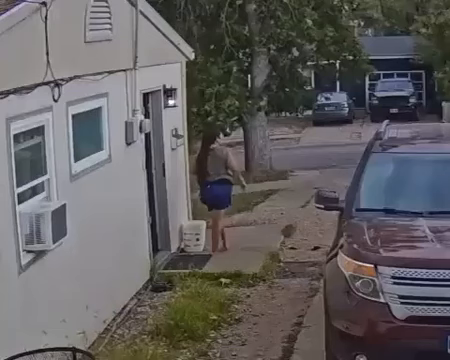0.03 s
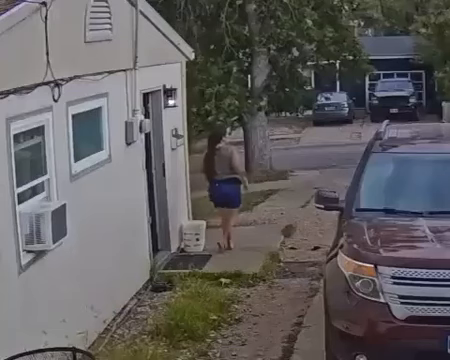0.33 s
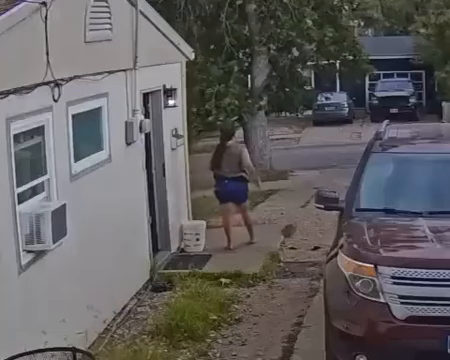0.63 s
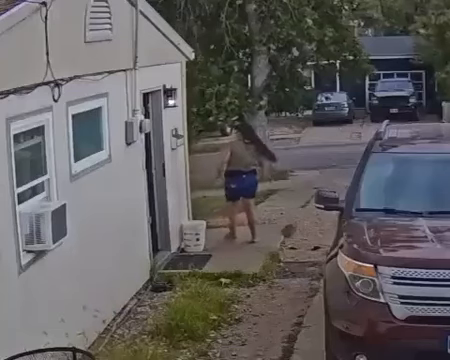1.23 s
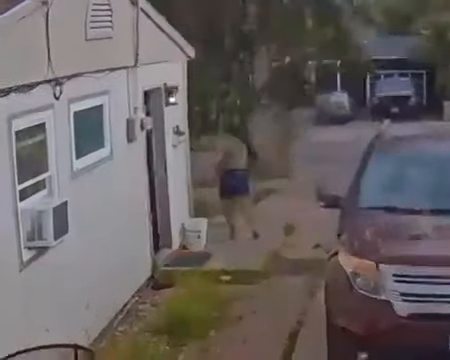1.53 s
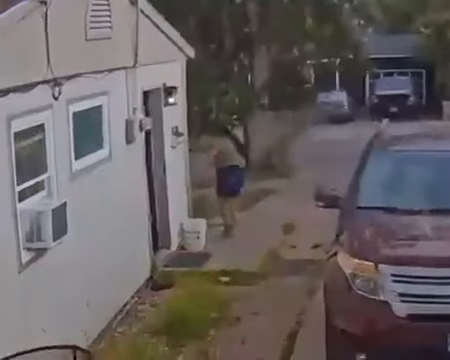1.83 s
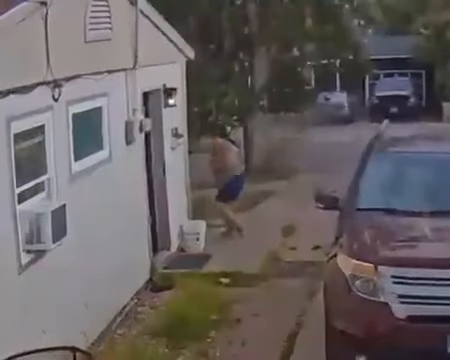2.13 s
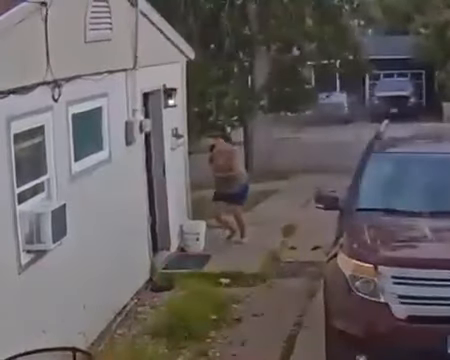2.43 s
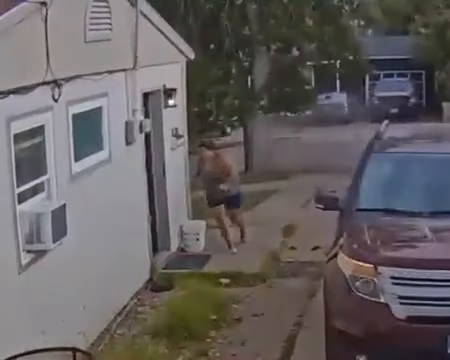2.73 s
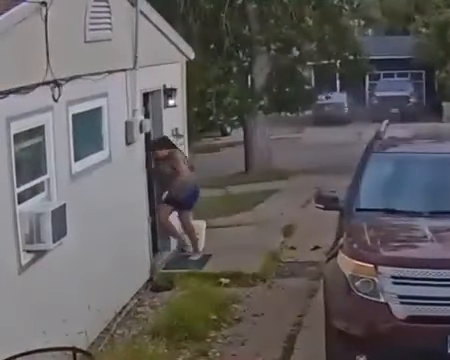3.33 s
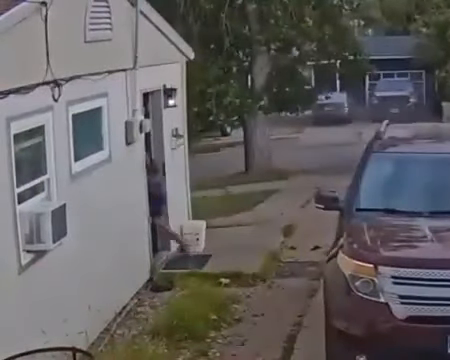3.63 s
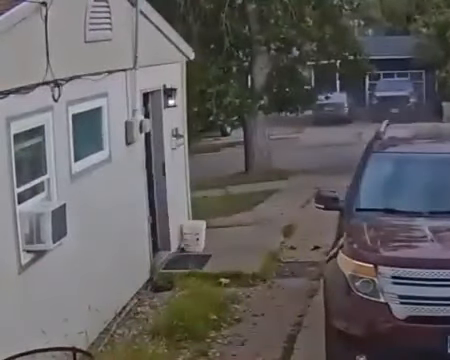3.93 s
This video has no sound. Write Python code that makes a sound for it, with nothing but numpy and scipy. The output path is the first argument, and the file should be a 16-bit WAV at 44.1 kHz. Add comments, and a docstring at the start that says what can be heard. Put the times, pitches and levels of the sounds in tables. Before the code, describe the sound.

A close lightning strike cracks violently, then rolls on as rumbling thunder.

```python
"""A lightning strike a few steps from a house: a bright crack of dense shock waves that dulls into
rolling peals from the bends of the bolt. A muffled rumble with dull bumps and a wavering drone leads in;
then sparks snap and a pressure front arrives just ahead of the crack. The house wall returns one quick
echo of crack and peals, and the small outdoor microphone overloads."""
import sys
import numpy as np
from scipy import signal
from scipy.fft import rfft, irfft, next_fast_len
from scipy.io import wavfile
from scipy.ndimage import uniform_filter1d, map_coordinates

SR = 44100
rng = np.random.default_rng(int(sys.argv[2]) if len(sys.argv) > 2 else 0)


def file_out(sig):
    """Save sig as 16-bit WAV at sys.argv[1]."""
    # one column per channel
    cols = np.atleast_2d(sig).T
    # limit, then scale
    lim = np.clip(cols, -1, 1)
    pcm = np.round(lim * 32767).astype(np.int16)
    wavfile.write(sys.argv[1], SR, pcm)


N = 176400
RUMBLE_S, FRONT_S, CRACK_S = .145, 1.481, 1.512  # entry cues
PUSH_S = .031  # length of the pressure front's push
TOP_HZ = 7100  # the microphone's band limit


def amp(db):
    """Decibels to gain."""
    return 10 ** (np.asarray(db) / 20)


def unit(x):
    """Scale to rms 1."""
    return x / np.sqrt(np.mean(x ** 2) + 1e-20)


def along(points, hz):
    """Read a curve of (freq_hz, value) points on a log frequency axis."""
    freqs, values = np.transpose(points)
    return np.interp(np.log(hz + 1), np.log(freqs + 1), values)


def since(start_s):
    """Seconds after a cue, zero before it."""
    return np.maximum(np.arange(N) / SR - start_s, 0)


def attack(start_s, rise_s):
    """An envelope that opens from 0 towards 1 at a cue."""
    return 1 - np.exp(-since(start_s) / rise_s)


def fader(points):
    """Gain per sample from (time_s, level_db) points."""
    return amp(np.interp(since(0), *np.transpose(points)))


def wobble(knots_per_s):
    """A smooth random curve."""
    return map_coordinates(rng.standard_normal(400), [since(0) * knots_per_s], mode="wrap")


def filtered(x, response):
    """Filter x by a gain given as a function of frequency."""
    size = next_fast_len(N + SR // 2)
    return irfft(rfft(x, size) * response(np.fft.rfftfreq(size, 1 / SR)), size)[:N]


def coloured(x, eq, even_s=.042):
    """Apply an EQ that rolls off above its last point, then even out slow swells to rms 1."""
    shaped = filtered(x, lambda hz: amp(along(eq, hz)) / np.maximum(hz / eq[-1][0], 1) ** 2)
    power = uniform_filter1d(shaped ** 2, int(even_s * SR))
    return shaped / np.sqrt(np.abs(power) + 1e-20)


def shocks(per_s=9000, spread_db=1.5):
    """Shock fronts of random size and sign at random moments."""
    arrives = rng.random(N) < per_s / SR
    return arrives * np.sign(rng.standard_normal(N)) * amp(spread_db * rng.standard_normal(N))


# Fader rides of the rumble's low and mid layers, before trim: time_s, level_db
LOW_RIDE = [(0.15, -21.5), (0.308, -34.5), (0.38, -18.5), (0.428, -25.5), (0.472, -14.5), (0.568, -27.5),
            (0.59, -25), (0.712, -36), (0.74, -40.5), (0.91, -28), (0.928, -32), (1.156, -26.5),
            (1.226, -40), (1.244, -28.5), (1.286, -44), (1.332, -42.5), (1.406, -27.5), (1.47, -20.5)]
MID_RIDE = [(0.15, -28.5), (0.266, -33), (0.304, -43), (0.354, -32.5), (0.502, -30), (0.546, -34.5),
            (0.708, -35.5), (0.77, -50), (1.036, -47), (1.082, -52), (1.194, -49.5), (1.212, -55),
            (1.248, -48.5), (1.266, -51), (1.348, -61), (1.37, -53), (1.428, -49.5), (1.47, -35)]
# Tone of the same two layers: freq_hz, gain_db
LOW_EQ = [(20, -27.5), (60, -15.5), (100, -10), (135, 0), (190, -1.5), (255, 3.5), (310, -6), (400, -9),
          (470, -28), (900, -41)]
MID_EQ = [(20, -16), (60, 3.5), (250, -4.5), (480, 1), (750, -4), (1080, -13), (1400, -24.5), (1800, -33.5),
          (1950, -54)]

def rumble(low_trim_db=-2, mid_trim_db=1.5, drone_peak_s=1.175, drone_half_s=.11):
    """Two layers of muffled noise that die away at the front; the low one briefly narrows to a drone."""
    drone_share = .81 * np.exp(-.5 * ((since(0) - drone_peak_s) / drone_half_s) ** 2)
    broad = coloured(rng.standard_normal(N), LOW_EQ)
    blend = np.sqrt(1 - drone_share) * broad + np.sqrt(drone_share) * drone()
    low = amp(low_trim_db) * fader(LOW_RIDE) * blend
    mid = amp(mid_trim_db) * fader(MID_RIDE) * coloured(rng.standard_normal(N), MID_EQ)
    fade_in = np.clip(since(RUMBLE_S) / .0025, 0, 1)
    return (low + mid) * fade_in * np.exp(-since(FRONT_S) / PUSH_S)


# Dull bumps in the rumble, before trim: start_s, pitch_hz, level_db
BUMPS = [(.145, 191, -14), (0.261, 203, -17), (.332, 150, -19), (.366, 260, -16), (0.392, 210, -14),
         (0.467, 256, -11), (0.901, 133, -17), (1.41, 157, -14), (1.459, 205, -21)]

def bumps(rise_s=.0025, t60_s=.041, trim_db=5.5):
    """Each bump is a low sine, damped within a few cycles."""
    x = np.zeros(N)
    for start_s, pitch_hz, level_db in BUMPS:
        t = since(start_s)
        envelope = attack(start_s, rise_s) * amp(level_db + trim_db - 60 * t / t60_s)
        x -= envelope * np.sin(2 * np.pi * pitch_hz * t)
    return x


def hiss(lead_in, relative_db=-38, floor_db=-71.5):
    """Faint hiss that follows the level of the lead-in, over a steady floor."""
    follower = np.sqrt(np.abs(uniform_filter1d(lead_in ** 2, size=400)))
    gain = np.hypot(amp(relative_db) * follower, amp(floor_db)) * (since(RUMBLE_S) > 0)
    return gain * unit(filtered(rng.standard_normal(N), lambda hz: hz < TOP_HZ))


def drone(pitch_hz=247, width_hz=22):
    """A narrow band of noise, heard as a wavering low tone."""
    phase = 2 * np.pi * pitch_hz * since(0)
    return unit(wobble(2 * width_hz) * np.sin(phase) + wobble(2 * width_hz) * np.cos(phase))


# Snaps just ahead of the crack: start_s, level_db
SPARKS = [(1.462, -42), (1.464, -35), (1.4705, -27), (1.475, -29), (1.483, -15.5), (1.4875, -19),
          (1.495, -22), (1.505, -22)]

def sparks(grit, t60_s=.007):
    """Each spark is a tiny burst of bright shocks with an instant attack."""
    return grit * sum((since(start_s) > 0) * amp(level_db - 60 * since(start_s) / t60_s)
                      for start_s, level_db in SPARKS)


def pressure_front(grit, push_db=-12.5, suction_db=-14, sizzle_db=-18, release_s=.01):
    """The front pushes, sizzles and swings into suction."""
    t, after_push = since(FRONT_S), since(FRONT_S + PUSH_S)
    release = np.exp(-after_push / release_s)
    push = amp(push_db) * (t > 0) * np.exp(-t / PUSH_S)
    pressure = np.where(after_push > 0, -amp(suction_db) * release, push)
    sizzle = amp(sizzle_db) * attack(FRONT_S, rise_s=.016) * release * grit
    return pressure + sizzle


# Bright tone of the crack, shared by sparks and sizzle: freq_hz, gain_db
CRACK_EQ = [(20, -5), (60, 3.5), (200, 1.5), (500, 1.5), (1000, -1), (2000, 0), (3500, 0.5), (5500, 3.5),
            (7000, 0.5)]
# How long each band stays at full strength: freq_hz, hold_s
CRACK_HOLD = [(30, 0.64), (200, 0.45), (1000, 0.34), (2000, 0.36), (3500, 0.2), (6000, 0.08)]
# Decay after the hold; farther parts of the bolt arrive duller: freq_hz, fade_db_per_s
CRACK_FADE = [(30, 31), (200, 11), (1000, 10.5), (2000, 13), (3500, 18), (6000, 29.5)]
CRACK_RISE_S = .0096

def crack(level_db=-11.5, surge_db=1.95, surges_per_s=22):
    """Dense shocks from the near part of the bolt hit, hold and fade in surges, treble first."""
    hz, t, spectrum = signal.stft(coloured(wall(shocks()), CRACK_EQ), SR, nperseg=1024)
    fading_s = np.maximum(t - CRACK_S - along(CRACK_HOLD, hz)[:, None], 0)
    fade = amp(-along(CRACK_FADE, hz)[:, None] * fading_s)
    tear = signal.istft(spectrum * fade, SR, nperseg=1024)[1][:N]
    surges = amp(surge_db * np.tanh(2 * since(CRACK_S)) * wobble(surges_per_s))
    return amp(level_db) * attack(CRACK_S, CRACK_RISE_S) * surges * tear


def wall(x, delay_s=.02407, gain=.52):
    """The sound plus its slap off the house wall, at equal total power."""
    echo = gain * np.pad(x, (round(delay_s * SR), 0))[:N]
    return (x + echo) / np.hypot(1, gain)


# Fader ride of the deep bass, before trim: time_s, level_db
SUB_RIDE = [(1.52, -30), (1.75, -28.5), (1.77, -26), (1.84, -18.5), (2.06, -33), (2.09, -21.5),
            (2.46, -37.5), (2.71, -36.5), (2.74, -48), (2.78, -30), (2.85, -41), (3.11, -40.5),
            (3.19, -46.5), (3.4, -44), (3.52, -42), (3.55, -39), (3.9, -58), (4.0, -40)]
# Its tone: freq_hz, gain_db
SUB_EQ = [(12, -8.5), (25, -2), (55, -1.5), (90, 2.5), (150, -23)]

def sub_bass(trim_db=-1):
    """Deep noise that opens with the crack and puts weight under the peals."""
    weight = coloured(rng.standard_normal(N), SUB_EQ)
    return amp(trim_db) * fader(SUB_RIDE) * attack(CRACK_S, CRACK_RISE_S) * weight


# Peals from the bends of the bolt:
# peak_s, half_length_s, boom_db, body_db, clap_db, rattle_db, crackle_db
PEALS = [(1.535, .008, -17.5, -30, -25, -30, -28), (1.654, .012, -22, -23.5, -21.5, -29, -21.5),
         (1.817, 0.018, -18.5, -21.5, -26, -33, -20.5), (1.906, 0.021, -17.5, -25.5, -26, -22.5, -29),
         (2.024, 0.024, -24.5, -18.5, -32.5, -23, -24), (2.1, 0.023, -19.5, -17.5, -37, -39, -45),
         (2.171, 0.026, -24.5, -18, -30, -23.5, -26.5), (2.27, 0.022, -20, -18.5, -33, -39, -26),
         (2.344, 0.016, -24.5, -18, -29, -29.5, -27.5), (2.447, 0.029, -25.5, -18.5, -25.5, -31, -45),
         (2.527, 0.024, -18.5, -21, -45, -44, -38), (2.566, 0.028, -19.5, -18, -25.5, -29, -26),
         (2.703, 0.022, -24, -23, -32.5, -30, -32), (2.795, 0.017, -21, -24, -34, -31, -33.5),
         (2.952, 0.033, -30, -24, -38, -30.5, -55), (3.063, 0.029, -28, -24, -32, -29, -44),
         (3.219, 0.03, -28, -23, -33.5, -46, -48), (3.277, 0.011, -26, -24.5, -43, -51, -48),
         (3.353, .016, -28.5, -19.5, -31, -44, -45), (3.405, 0.016, -20.5, -25, -18.5, -31, -38),
         (3.451, 0.033, -39.5, -33, -37.5, -33, -41.5), (3.597, .024, -24.5, -22, -31, -32, -42),
         (3.695, 0.038, -34, -25, -33.5, -33.5, -48), (3.751, 0.023, -29, -22, -33, -30, -51),
         (3.804, .016, -25, -20.5, -41, -33, -58), (3.888, 0.034, -25.5, -25, -42.5, -41.5, -49),
         (3.99, 0.028, -30.5, -21.5, -52, -45, -56)]
# Tone of a peal's five registers, dark to bright: freq_hz, gain_db
BOOM_EQ = [(20, -23.5), (60, -16), (110, -7.5), (170, 0), (300, 1), (390, -0.5), (520, -9.5), (1000, -51.5)]
BODY_EQ = [(200, -45), (350, -2.5), (450, 2.5), (700, -3), (950, -3.5), (1250, -20), (2500, -31),
           (7000, -51)]
CLAP_EQ = [(500, -26), (850, -2), (1150, 0), (1450, -4), (1750, -5.5), (2300, -25), (4000, -41.5)]
RATTLE_EQ = [(900, -24.5), (1400, -7.5), (1750, 4), (2150, 3.5), (2400, -6), (2800, -12.5), (3500, -27)]
CRACKLE_EQ = [(1500, -23.5), (2600, 7.5), (3700, 1), (4500, -6), (5500, -8.5), (7000, -16.5)]

def peals(shocks_per_s=1800, crackle_per_s=660):
    """Each peal is a swelling cluster of shocks with its own mix of five registers."""
    peak_s, half_length_s, *levels_db = np.transpose(PEALS)
    swells = np.exp(-.5 * ((since(0) - peak_s[:, None]) / half_length_s[:, None]) ** 2)
    registers = BOOM_EQ, BODY_EQ, CLAP_EQ, RATTLE_EQ, CRACKLE_EQ
    rates = [shocks_per_s] * 4 + [crackle_per_s]
    x = np.zeros(N)
    for level_db, eq, per_s in zip(levels_db, registers, rates):
        envelope = np.sqrt(amp(level_db) ** 2 @ swells)  # overlapping peals add in power
        x += envelope * patchy(coloured(wall(shocks(per_s)), eq))
    return x


def patchy(x, depth_db=1.8):
    """Random patches of gain, a few hundred Hz by a tenth of a second, vary each peal's colour."""
    spectrum = signal.stft(x, nperseg=1024)[2]
    across_bands = uniform_filter1d(rng.standard_normal(spectrum.shape), size=6, axis=0)
    patches = unit(uniform_filter1d(across_bands, size=8, axis=1))
    return unit(signal.istft(spectrum * amp(depth_db * patches), nperseg=1024)[1][:N])


def scene():
    """Lead-in, strike and rolling tail, mixed in mono."""
    lead_in = rumble() + bumps()
    bed = lead_in + hiss(lead_in)
    grit = coloured(shocks(), CRACK_EQ)
    strike = sparks(grit) + pressure_front(grit) + crack()
    return (bed + strike + peals() + sub_bass())[None]


def record(dry):
    """The overloaded microphone rounds off the peaks and keeps nothing above its band limit."""
    ceiling_db, knee = -7, 4.6
    clipped = dry[0] / (1 + np.abs(dry[0] / amp(ceiling_db)) ** knee) ** (1 / knee)
    return filtered(clipped, lambda hz: 1 / np.sqrt(1 + (hz / TOP_HZ) ** 160))[None]


dry = scene()
out = record(dry)
file_out(out)
```